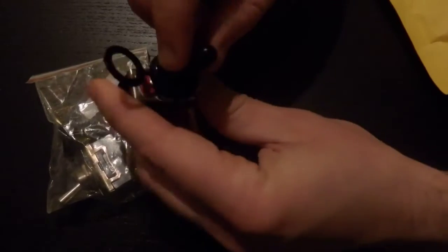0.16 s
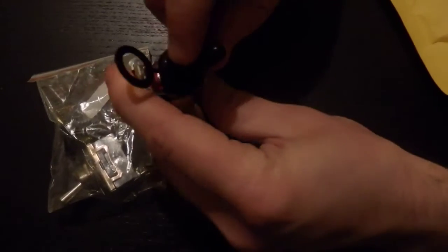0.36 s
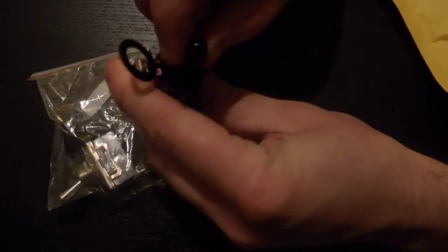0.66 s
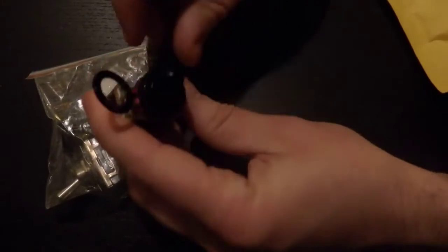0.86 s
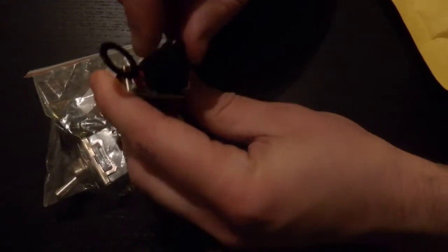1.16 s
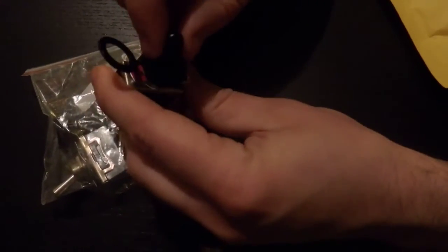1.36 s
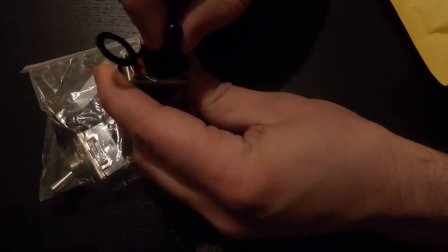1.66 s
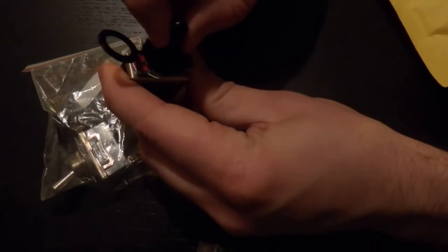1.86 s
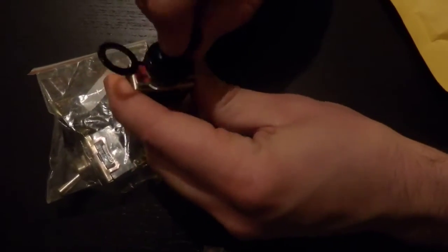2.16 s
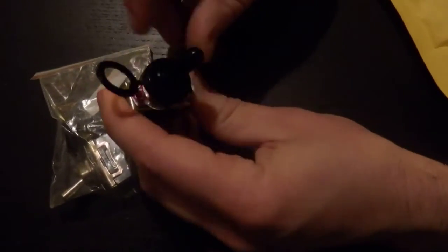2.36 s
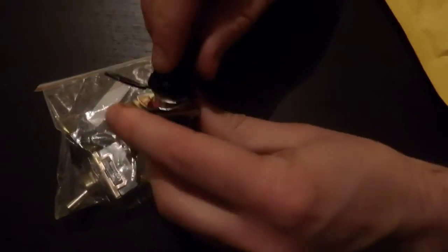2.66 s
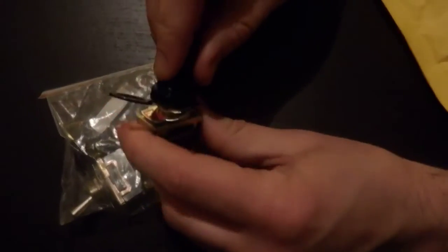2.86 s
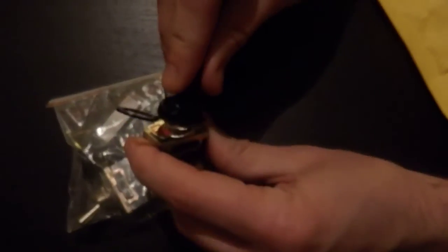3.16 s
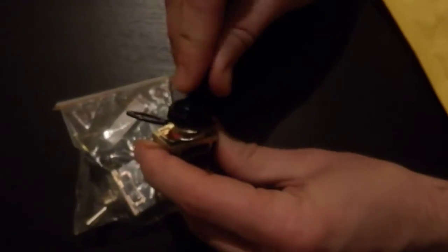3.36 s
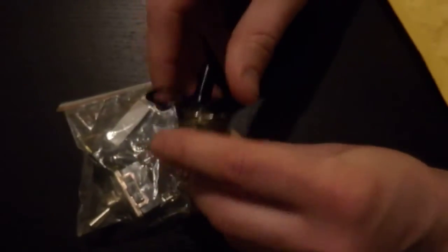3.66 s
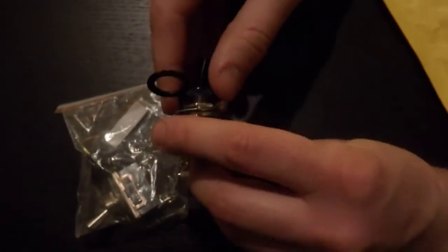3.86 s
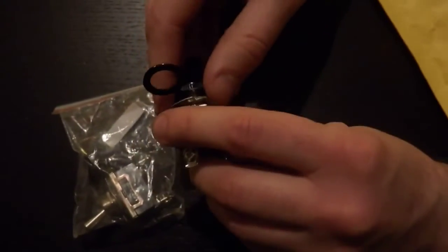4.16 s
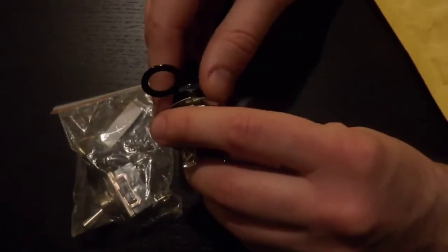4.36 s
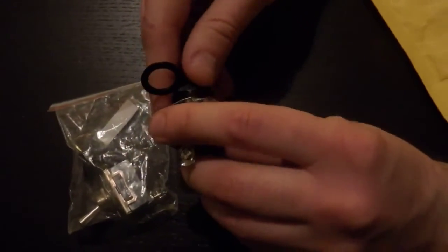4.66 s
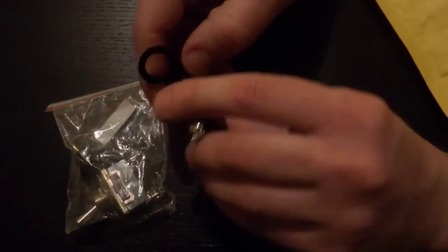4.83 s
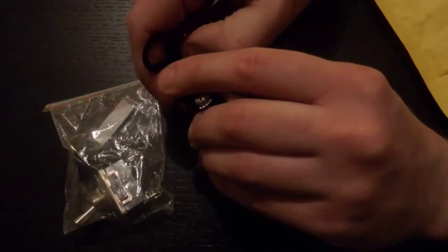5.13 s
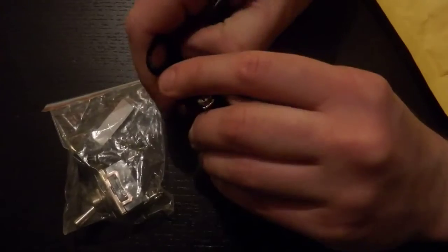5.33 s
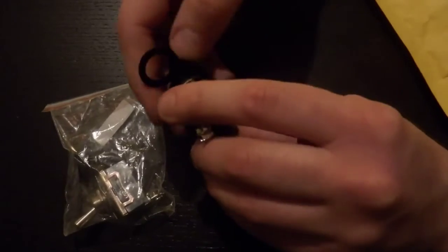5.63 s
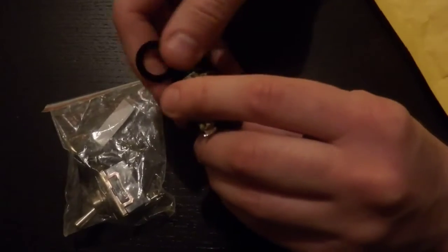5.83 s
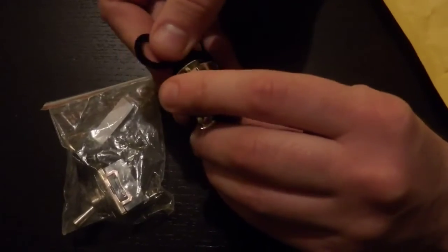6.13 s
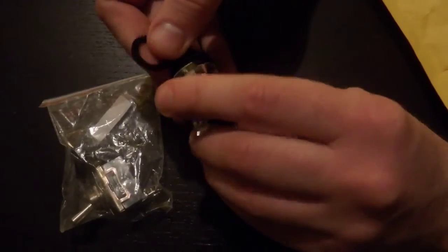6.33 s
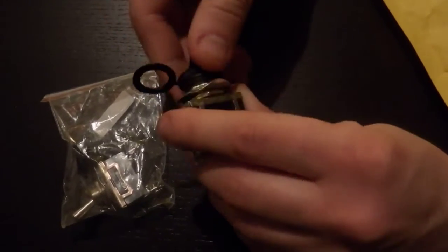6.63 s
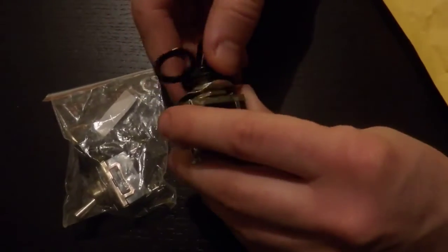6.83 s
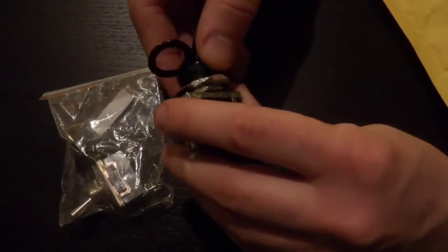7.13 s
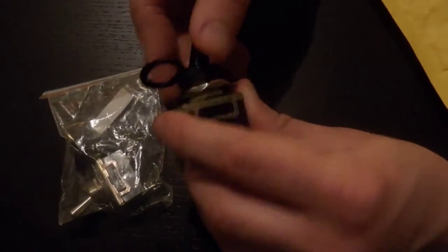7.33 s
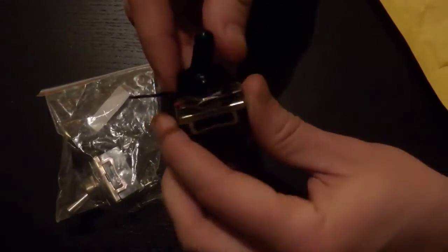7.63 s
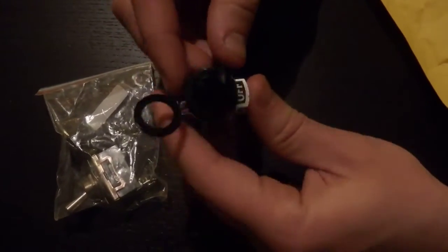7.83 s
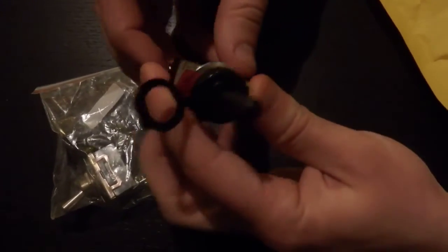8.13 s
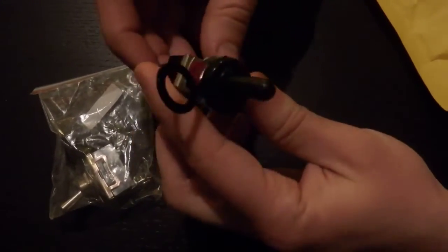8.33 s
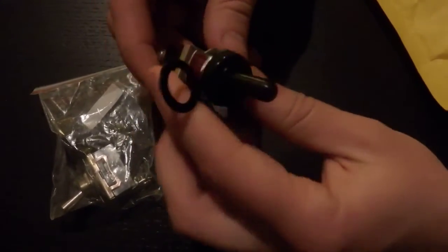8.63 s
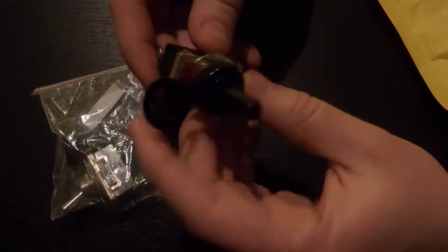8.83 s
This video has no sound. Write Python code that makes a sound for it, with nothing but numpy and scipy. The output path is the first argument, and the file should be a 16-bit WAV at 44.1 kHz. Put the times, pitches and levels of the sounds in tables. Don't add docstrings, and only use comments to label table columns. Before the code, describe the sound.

Very close, hands work a small metal toggle switch. A bright snap comes early, a second, bouncing one around two seconds, and a softer one near eight. Between them are dull finger knocks, thin metal ticks and faint skin rubbing, ending in a loose nut rattle. A low machine drones through the wall; the camera's stereo microphones hiss and its focus motor ticks softly.

```python
import sys
import numpy as np
from scipy import signal
from scipy.fft import rfft, irfft
from scipy.io import wavfile
from scipy.ndimage import uniform_filter1d

SR = 44100
rng = np.random.default_rng(int(sys.argv[2]) if len(sys.argv) > 2 else 0)


def unload_wav(signal):
    wavfile.write(
        sys.argv[1],
        SR,
        np.round(np.clip(np.atleast_2d(signal).T, -1, 1) * 32767).astype(np.int16),
    )


def makeup_ratio(level_db):
    decades = np.asarray(level_db, float) / 20
    return 10 ** decades


N = 396459


def evened(x):
    return x / np.sqrt(np.mean(abs(x) ** 2) + 1e-30)


def read(points, hz):
    f, value = np.transpose(points)
    return np.interp(np.log(hz + 1), np.log(f + 1), value)


def unit(shape):
    return shape / np.sqrt(np.sum(shape ** 2, 0))


def peak(hz, centre_hz, width_hz):
    return 1 / (1 + (2 * (hz - centre_hz) / width_hz) ** 2)


def add(mix, s, sound):
    part = mix[round(s * SR):][:len(sound)]
    part += sound[:len(part)]


def band(x, lo_hz, hi_hz):
    highpass = signal.butter(4, lo_hz, "highpass", fs=SR, output="sos")
    spectrum = rfft(signal.sosfilt(highpass, x))
    edge = np.clip((hi_hz - np.fft.rfftfreq(N, 1 / SR)) / 150, 0, 1)
    return irfft(spectrum * edge, N)


def noise(magnitude, same, size):
    hop = size // 4
    hz = np.fft.rfftfreq(size, 1 / SR)
    t = np.arange(N // hop + 5) * hop / SR
    a, b, c, d = rng.standard_normal((len(t), len(hz), 4)).T
    left, other = a + 1j * b, c + 1j * d
    like = np.clip(same(hz), -1, 1)[:, None]
    right = like * left + np.sqrt(1 - like ** 2) * other
    gain = np.sqrt(4 / (3 * size))
    z = gain * np.array([left, right]) * magnitude(hz[:, None], t)
    sound = signal.istft(z, nperseg=size, noverlap=size - hop)[1][:, :N]
    return sound * np.sqrt(size) / 1.6


def ring(drive, modes, spread_db, detune):
    t = np.arange(600) / SR
    luck = rng.standard_normal((len(modes), 2))
    body = np.zeros(len(t))
    for (hz, width_hz, db), (louder, sharper) in zip(modes, luck):
        decay = np.pi * abs(width_hz) * t
        envelope = (1 - np.exp(-3 * decay)) * np.exp(-decay)
        tone = np.sin(2 * np.pi * hz * (1 + detune * sharper) * t)
        body += makeup_ratio(db + spread_db * louder) * envelope * tone
    out = np.convolve(drive, body)
    return out / abs(out).max()


# frequency [Hz], density [dB per Hz].
HISS_SPECTRUM = [(700, -32), (1300, -3), (2000, -8.5), (3700, -18), (7400, -16.5), (8500, -16.5),
                 (10100, -20.5), (12100, -19.5), (13500, -15.5), (15000, -10), (15500, -11.5), (15750, 2),
                 (15900, -10)]


def hiss():
    def field(hz, t):
        level_db = -65.5 + 0 * t
        return makeup_ratio(level_db) * unit(makeup_ratio(read(HISS_SPECTRUM, hz)))
    return noise(field, lambda hz: 0.11 + 0 * hz, size=1024)


def cycle(t, first_s, period_s, mean_db, swing_db):
    return makeup_ratio(mean_db + swing_db * np.cos(2 * np.pi * (t - first_s) / period_s))


# middle [s], length [s], frequency [Hz], level [dB].
HELD_TONES = [(0.198, .4, 72, -59), (0.721, .8, 72, -64.5), (1.901, 1.6, 72, -68.5), (8.302, .25, 72, -66),
              (.12, .25, 219, -65), (4.15, .6, 219, -58.5), (5.948, .6, 219, -56.5),
              (6.452, .6, 219, -61.5), (7.75, .2, 219, -60), (7.98, .25, 219, -52), (8.161, .3, 219, -56),
              (2.151, .45, 263, -60.5), (2.782, .3, 263, -59.5), (3.8, .6, 263, -58.5),
              (4.351, .6, 263, -57), (6.699, .8, 263, -62), (7.58, .3, 263, -58.5), (7.87, .4, 263, -58),
              (8.7, .35, 263, -60), (0.247, .25, 326, -62), (0.596, .25, 326, -63), (7.798, .6, 326, -62),
              (1.801, .4, 412, -61), (6.05, .4, 412, -59.5), (.55, .55, 682, -63.5), (1.753, .25, 682, -69),
              (3.103, .4, 682, -68), (4.249, .45, 682, -64), (5.945, .2, 682, -66.5)]


def hums():
    t, out = np.arange(N) / SR, np.zeros(N)
    waver = evened(uniform_filter1d(rng.standard_normal(N), size=4000))
    for s, length, hz, db in HELD_TONES:
        start, end = round((s - length / 2) * SR), round((s + length / 2) * SR)
        on = slice(max(start, 0), end)
        swell = np.cos(np.pi * (t[on] - s) / length)
        phase = 2 * np.pi * np.cumsum(hz + 1.48 * waver[on]) / SR
        out[on] += np.sqrt(2) * makeup_ratio(db) * swell * np.sin(phase)
    return out


# frequency [Hz], density [dB per Hz].
DRONE_SPECTRUM = [(15, -44.5), (25, -23), (70, -4.5), (118, -5.5), (161, -3.5), (196, 0.5), (331, -1.5),
                  (605, -9), (795, -9), (1170, -20), (1320, -33), (2600, -35.5), (3380, -69), (5720, -120)]
# frequency [Hz], width [Hz], height above it [dB].
DRONE_MODES = [(126, 18, 3.5), (172.3, 12.2, 8), (328, 10.1, 6.5), (415.5, 14, 6), (553, 8.9, 6.5),
               (799, 38, 3.5)]
# frequency [Hz], likeness [-1 to 1].
DRONE_LIKENESS = [(60, 0.93), (180, 0.99), (550, 0.92), (1650, 0.7), (4970, -0.71), (15000, 0.81)]
# first top [s], period [s], mean [dB], swing [dB].
LOAD_CYCLE = (0.3, 2.1, -49.5, 1)
# first top [s], period [s], mean [dB], swing [dB].
JET_CYCLE = (0.3, 2, -86, 6)


def machine():
    def field(hz, t):
        modes_db = sum(db * peak(hz, mode_hz, width_hz) for mode_hz, width_hz, db in DRONE_MODES)
        body = unit(makeup_ratio(read(DRONE_SPECTRUM, hz) + modes_db))
        jet = unit(peak(hz, 8380, 400))
        return np.hypot(body * cycle(t, *LOAD_CYCLE), jet * cycle(t, *JET_CYCLE))
    drone = noise(field, lambda hz: read(DRONE_LIKENESS, hz), size=4096)
    return (drone + hums()) * makeup_ratio([[-1], [1]])


# frequency [Hz], width [Hz], level [dB].
FOCUS_CLICK = [(4700, 500, -7), (5400, 300, -9), (6400, 700, -5), (7200, 450, 0), (8650, 500, 1),
               (9600, 700, -6)]
# frequency [Hz], width [Hz], level [dB].
FOCUS_SHELL = [(1170, 110, 2), (1480, 200, -2), (1870, 110, 0), (2030, 200, -5), (2260, 220, -10)]


def focus():
    first_s, period_s = 1.2153, 0.06673
    gear_db, start_db, ease_s = 3.5, 4.5, 0.96
    out, t = np.zeros((2, N)), np.arange(400) / SR
    for k in range(1, 75):
        late_s, click_db, knock_db = rng.standard_normal(3) * [.0004, 1.5, 1.5]
        s = first_s + k * period_s + late_s
        for side in out:
            burst = rng.standard_normal(400) * np.exp(-t / 0.001)
            click = ring(burst, FOCUS_CLICK, spread_db=2.5, detune=0.013)
            add(side, s + .0002, makeup_ratio(-54.5 + click_db) * click)
        impacts = rng.standard_normal(400) * (rng.random(400) < .05)
        shake = t * np.exp(-t / 0.0023) * impacts
        load_db = gear_db * (k % 4 == 0) + start_db * np.exp(-(s - first_s) / ease_s)
        low = makeup_ratio(load_db) * ring(shake, FOCUS_SHELL[:2], spread_db=2.5, detune=0.029)
        high = ring(shake, FOCUS_SHELL[2:], spread_db=2.5, detune=0.017)
        knock = makeup_ratio(-61 + knock_db) * (low + high)
        for side, pan_db in zip(out, (-.8, .8)):
            add(side, s - .001, makeup_ratio(pan_db) * knock)
    return out


# hardest moment [s], length [s], dull part [dB], bright part [dB].
RUB_STROKES = [(0.709, 0.041, -55, -87), (1.08, 0.2, -74, -92), (2.55, .2, -78, -69),
               (3.333, .16, -72, -92.5), (3.52, 0.083, -64.5, -88), (6.426, 0.22, -69, -72.5),
               (6.65, 0.22, -81.5, -76), (6.893, 0.042, -85, -57), (7.47, 0.33, -67.5, -76),
               (7.537, 0.11, -66, -86), (7.918, .06, -88, -65), (8.4, .12, -80, -92),
               (8.49, .12, -90.5, -73), (8.693, .12, -70.5, -78), (8.88, 0.088, -66, -59.5),
               (8.941, 0.048, -56, -49), (8.963, .07, -75.5, -73)]
# frequency [Hz], density [dB per Hz].
RUB_DULL = [(1200, -11), (2500, 5), (3300, -10.5), (5500, -7), (8000, -16), (11000, -61)]
# frequency [Hz], density [dB per Hz].
RUB_BRIGHT = [(7000, -17), (10000, -14), (13500, -7), (15700, -4), (16500, -19)]


def rubbing():
    s, length, dull_db, bright_db = np.transpose(RUB_STROKES)[:, :, None]
    fade_db = 20.5

    def field(hz, t):
        stroke = makeup_ratio(-2 * fade_db * abs(t - s) / length)
        stick = makeup_ratio(4.5 * rng.standard_normal(len(t)))
        dull = unit(makeup_ratio(read(RUB_DULL, hz))) * np.linalg.norm(makeup_ratio(dull_db) * stroke, axis=0)
        bright = unit(makeup_ratio(read(RUB_BRIGHT, hz))) * np.linalg.norm(makeup_ratio(bright_db) * stroke, axis=0)
        return stick * np.hypot(dull, bright)
    return noise(field, lambda hz: 0.88 + 0 * hz, size=256)


# frequency [Hz], t60 [s].
ROOM_DECAY = [(1500, 0.4), (3000, 0.53), (6000, 0.5), (10000, 0.34), (16000, 0.1)]


def room(x):
    hz, t, z = signal.stft(rng.standard_normal((2, 2, SR // 2)), SR, nperseg=128)
    decay = makeup_ratio(-60 * t / read(ROOM_DECAY, hz)[:, None])
    tails = signal.istft(z * decay, SR, nperseg=128)[1]
    build_up = np.clip(np.arange(tails.shape[2]) / SR / 0.0046 - .3, 0, 1)
    tails = tails * build_up
    tails = tails / np.linalg.norm(tails[:, 0])
    walls = x * evened(uniform_filter1d(rng.standard_normal((2, 1, N)), size=60))
    return makeup_ratio(-18) * signal.fftconvolve(walls, tails, axes=2).sum(0)[:, :N]


# frequency [Hz], left minus right [dB].
PORT_BALANCE = [(1000, -1), (2200, -2.5), (4000, 3.5), (8000, -6.5), (12000, -1.4), (16000, -1.2)]
# frequency [Hz], lead of the left [radians].
PORT_LEAD = [(500, .3), (2000, 1.2), (4000, .9), (8000, 1.2), (13000, 1.35)]


def ports(x):
    hz = np.fft.rfftfreq(64, 1 / SR)
    half = makeup_ratio(read(PORT_BALANCE, hz) / 2) * np.exp(.5j * read(PORT_LEAD, hz))
    taps = np.fft.fftshift(irfft(np.array([half, 1 / half])), axes=1) * np.hanning(64)
    return signal.oaconvolve(x[None], taps, axes=1)[:, 32:N + 32]


def scrape(ms):
    t = np.arange(512) / SR
    shape = np.minimum(t / 0.00027, 1) * np.exp(-t / (max(ms, .15) / 1000))
    force = rng.standard_normal(len(t)) * shape
    for _ in range(6):
        spectrum = rfft(force)
        flat = irfft(spectrum / (abs(spectrum) + 1e-12))
        force = flat / np.sqrt(uniform_filter1d(flat ** 2, size=12) + 1e-12) * shape
    return force


# time [s], low modes [dB], upper modes [dB], loudest mode [Hz].
TAPS = [(0.259, -58, -64, 2060), (0.4711, -61, -61, 1980), (0.7013, -48, -57, 2200),
        (0.7092, -60, -53, 2730), (1.6592, -34.5, -30, 4430), (1.7507, -66, -63, 1900),
        (1.768, -40, -35, 2960), (2.276, -37.5, -51, 2270), (2.8494, -60, -51, 5300),
        (3.356, -51, -75, 2250), (3.5227, -61, -59, 2220), (5.5133, -43.5, -45.5, 5550),
        (5.7993, -55.5, -56, 2220), (5.8214, -71, -55, 1940), (5.859, -61, -51, 5100),
        (6.2534, -74, -56, 2320), (6.3524, -57.5, -49, 2170), (6.6925, -58, -56, 2620),
        (7.13, -53.5, -70, 2610), (7.6939, -52, -50, 2250), (7.792, -56, -54, 3540),
        (7.815, -56, -58, 1910), (8.0186, -55, -50.5, 3640), (8.086, -59, -52, 2200)]
# time [s], strength [dB], share reaching the body [dB].
TICKS = [(0.315, -45, -8.5), (0.726, -47, -14), (2.2924, -54, -9), (4.0761, -58, -14), (4.113, -41, -13),
         (4.1754, -56, -9), (4.4548, -52, -12), (4.6705, -33, -31), (4.6738, -33.5, -16),
         (4.9436, -56, -13), (5.0827, -36, -28), (5.309, -56, -18), (6.505, -68, 7), (6.6444, -49, -8),
         (6.8862, -53, -6), (6.893, -38.5, -28), (7.4066, -55, -15), (7.467, -58, -4), (7.507, -44, -14),
         (7.5197, -50, -8), (7.5714, -51, -12), (7.805, -49, -6), (7.9099, -56, -20), (7.9264, -53, -20),
         (8.0316, -38.5, -13), (8.8498, -57, 0), (8.8736, -54, -4)]
# time [s], high, low and middle modes [dB, dB, dB], loudest mode [Hz].
RATTLES = [
    (8.6766, -66, -76, -54, 9250),
    (8.6830, -80, -76, -54, 4940),
    (8.6928, -48, -64, -46.5, 9200),
    (8.9155, -33, -56, -53, 9400),
    (8.9303, -42, -68, -62, 14640),
    (8.939, -28.5, -63, -40, 13800),
    (8.943, -32, -52, -34, 9260),
]
# time [s], high, low and middle modes [dB, dB, dB], loudest mode [Hz].
SNAPS = [(0.5180, -39.5, -41, -36, 9000), (0.5248, -12.5, -18.5, -13, 15560),
         (0.5261, -17, -40, -40, 15600), (2.0660, -34, -38, -56, 13200), (2.0688, -16.5, -19, -19.5, 4350),
         (2.0729, -35, -34, -24, 8700), (2.0753, -17, -42, -38, 13730), (2.0773, -24, -41, -35, 14200),
         (2.0810, -37, -34, -44, 4360), (2.0844, -25, -52, -42, 15600), (2.0879, -24, -43, -33.5, 14000),
         (2.0974, -23, -45, -52, 15300), (8.1167, -18, -35.5, -37.5, 2200), (8.12, -32, -45, -39, 2600),
         (8.124, -45, -55, -40.5, 3300)]


def contacts():
    snaps = [(*row, 0.67) for row in SNAPS]
    rattles = [(*row, 1.6) for row in RATTLES]
    ticks = [(s, db, db + body_db - 5.5, db + body_db, 2200, 1) for s, db, body_db in TICKS]
    taps = [(s, upper_db - 5.5, low_db, upper_db, hz, 1) for s, low_db, upper_db, hz in TAPS]
    return snaps + rattles + ticks + taps


# frequency [Hz], width [Hz], level [dB].
BODY_LOW = [(2750, 420, -1), (3090, 420, 0.5), (4030, 500, 4)]
# frequency [Hz], width [Hz], level [dB].
BODY_MID = [(5090, 520, 3), (6220, 370, 2), (7670, 240, -11.5), (8370, 510, 0), (9000, 520, 4)]
# frequency [Hz], width [Hz], level [dB].
BODY_HIGH = [(9600, 990, -10), (11670, 960, -9), (13200, 500, -12), (14100, 820, -8.5), (14270, 600, -10.5),
             (15000, 330, -5)]
# frequency [Hz], level [dB], t60 [s].
SPRING = [(13285, -45, .24), (13755, -41, .17), (13940, -47, .12), (14410, -46, .12), (14650, -44, .13),
          (15700, -39, .14)]
# frequency [Hz], level [dB], t60 [s].
TINK = [(1900, -54, .19), (3170, -77, .3), (4330, -74, .25)]
# frequency [Hz], level [dB], t60 [s].
NUT = [(9400, -56, .06), (13850, -50, .09), (15100, -54, .07)]
# frequency [Hz], level [dB], t60 [s].
LEVER = [(4450, -72, .3), (4560, -73, .25)]


def switch():
    out = np.zeros(N)
    for s, high_db, low_db, mid_db, loud_hz, ms in contacts():
        force = scrape(ms)
        force[12] += 2.6 * np.linalg.norm(force)
        regions = ((low_db, BODY_LOW, 0, 4600), (mid_db, BODY_MID, 4600, 10000),
                   (high_db, BODY_HIGH, 10000, SR))
        for db, modes, lo_hz, hi_hz in regions:
            loud = [(loud_hz, 270, 1.5)] if lo_hz < loud_hz <= hi_hz else []
            add(out, s - .0003, makeup_ratio(db) * ring(force, modes + loud, spread_db=1, detune=.006))
    t = np.arange(SR // 4) / SR
    for s, modes in ((2.074, SPRING), (2.851, TINK), (8.916, NUT), (1.662, LEVER)):
        for hz, db, t60 in modes:
            rattle = evened(uniform_filter1d(rng.standard_normal(len(t)), size=250))
            tone = np.sin(2 * np.pi * hz * t)
            add(out, s, makeup_ratio(db - 60 * t / t60) * (1 + .3 * rattle) * tone)
    return band(out, 1770, 16450)


def scene():
    near = switch()
    around = room(near) + rubbing() + focus() + hiss()
    return ports(near) + band(around, 200, 15900) + machine()


def low_pass(x):
    return signal.sosfilt(signal.butter(12, 17160, fs=SR, output="sos"), x)


def record(dry):
    return low_pass(dry)


dry = scene()
out = record(dry)
unload_wav(out)
```